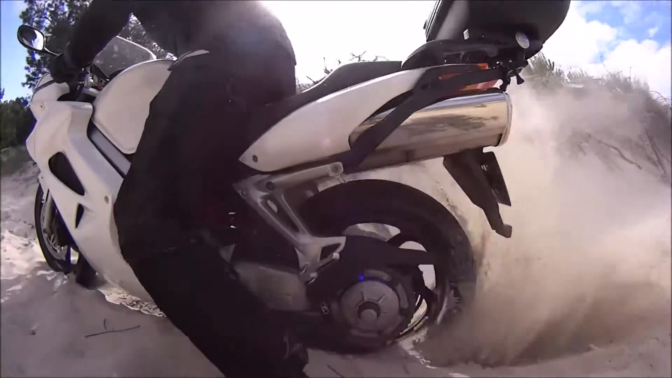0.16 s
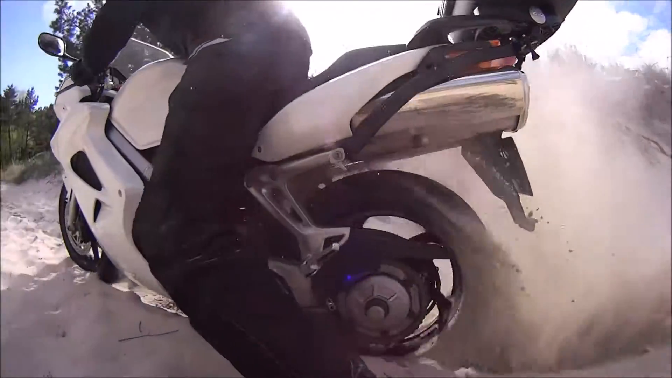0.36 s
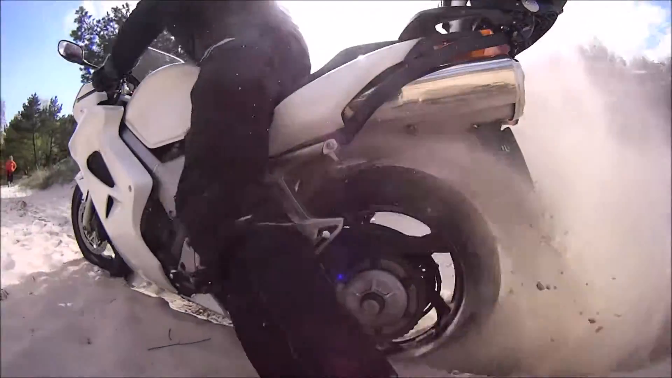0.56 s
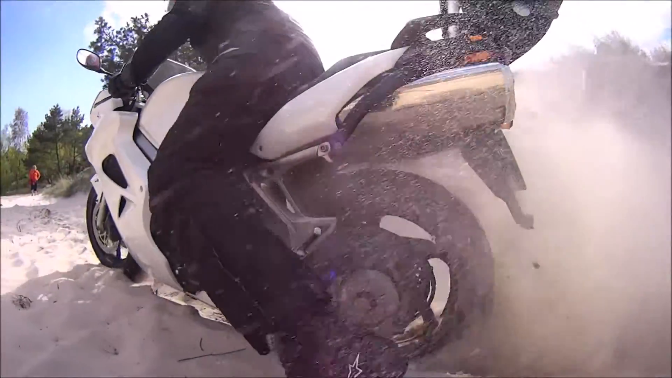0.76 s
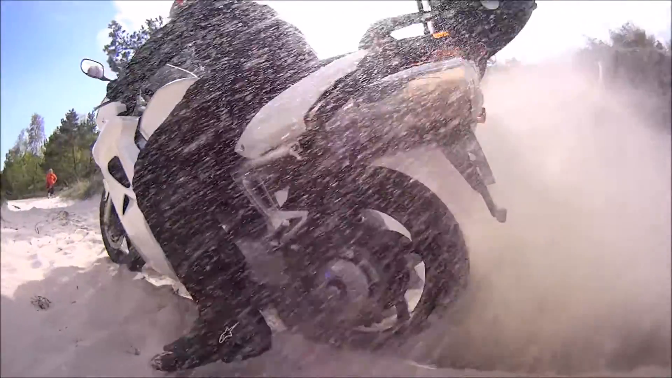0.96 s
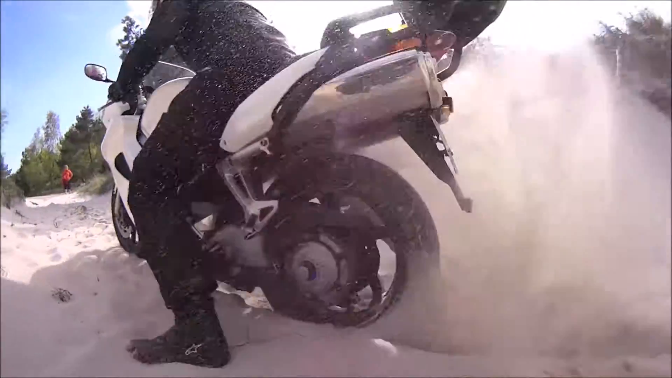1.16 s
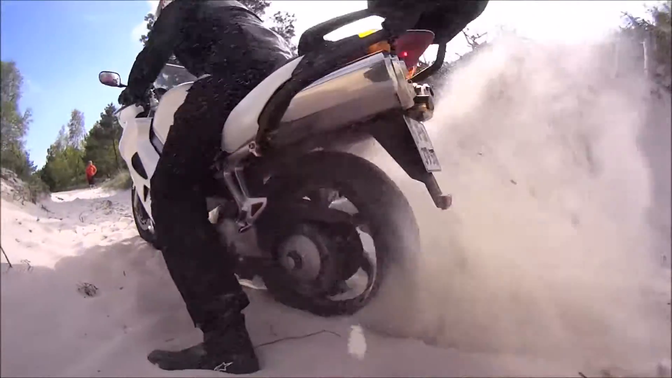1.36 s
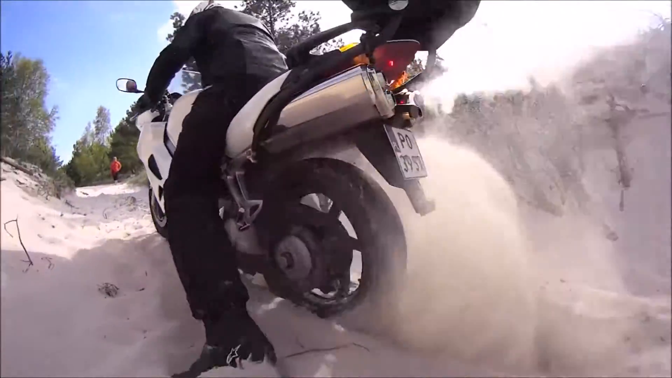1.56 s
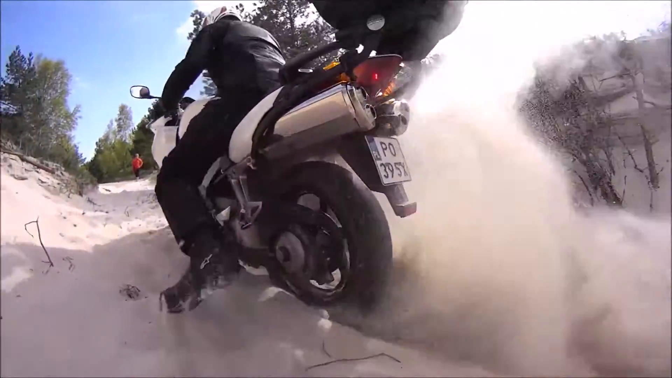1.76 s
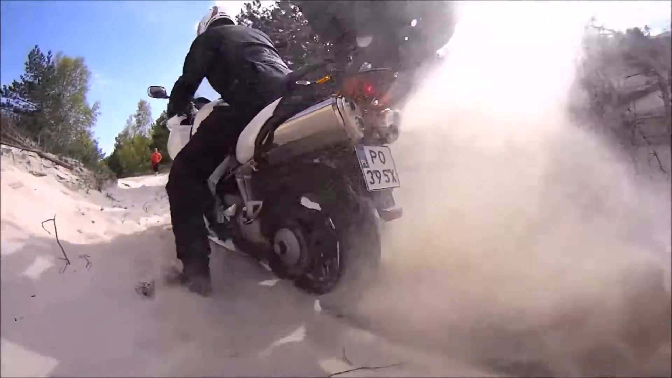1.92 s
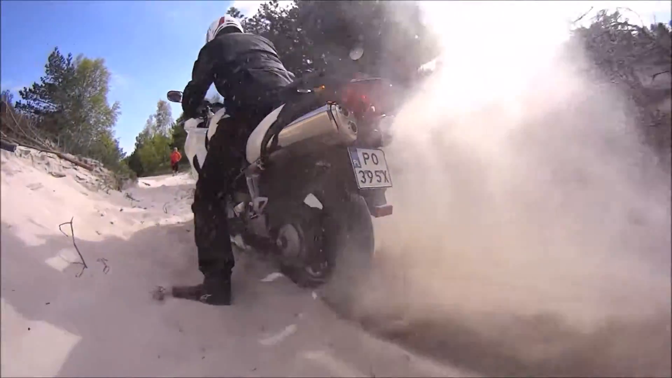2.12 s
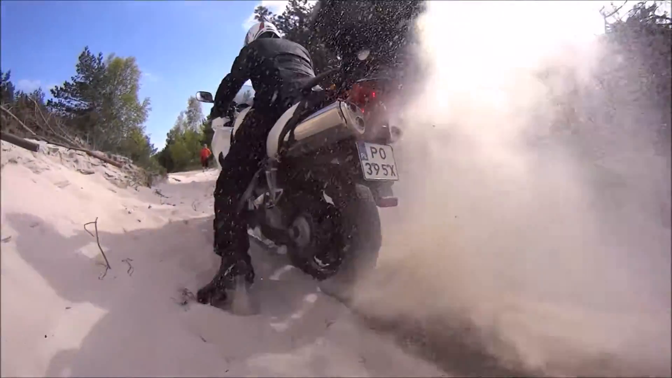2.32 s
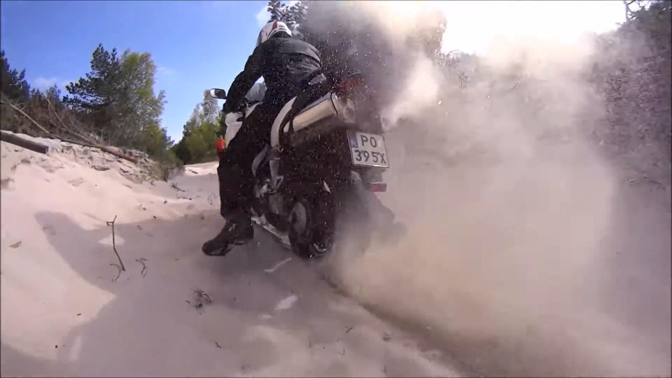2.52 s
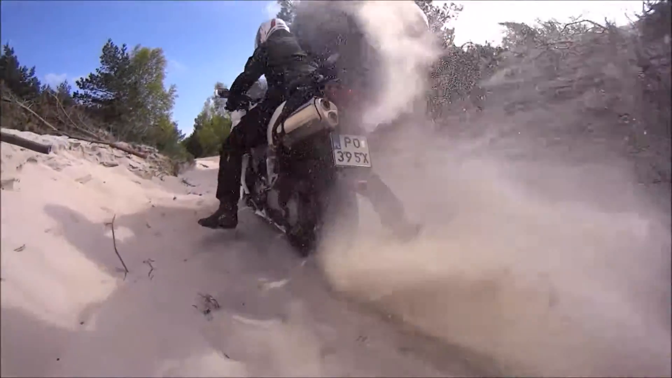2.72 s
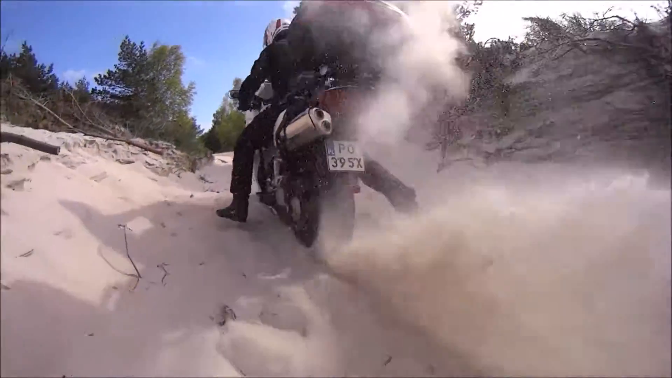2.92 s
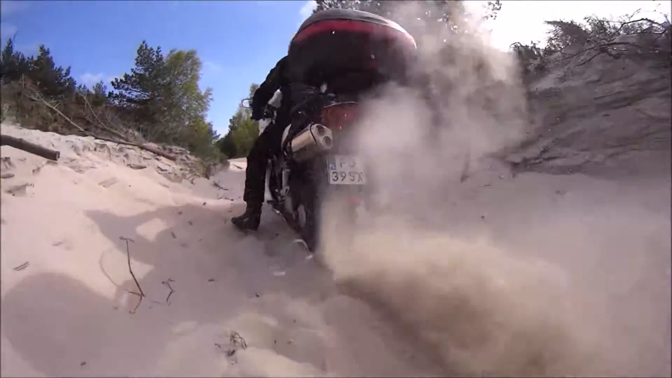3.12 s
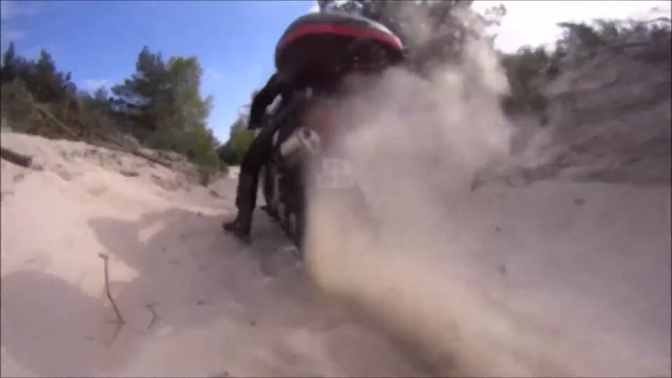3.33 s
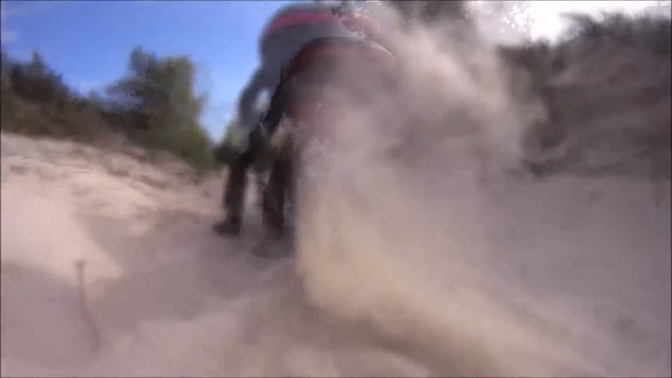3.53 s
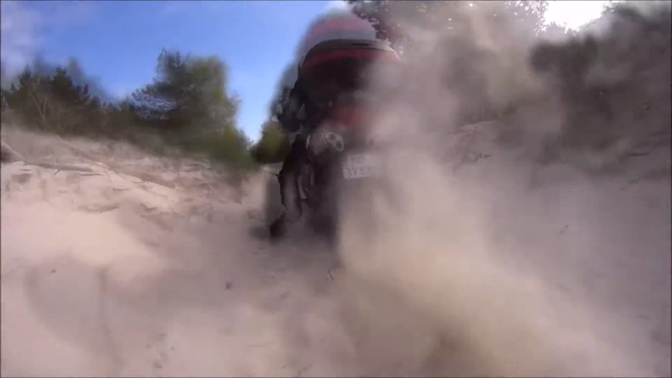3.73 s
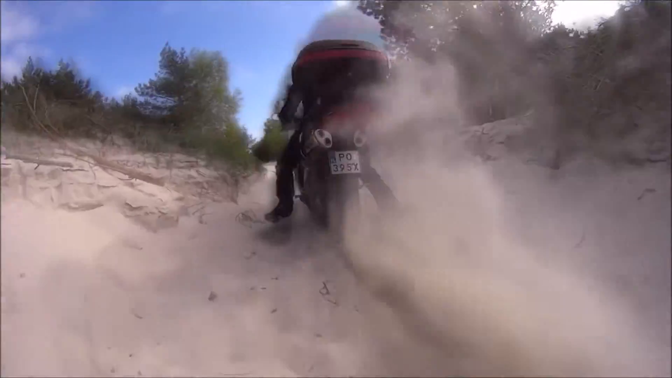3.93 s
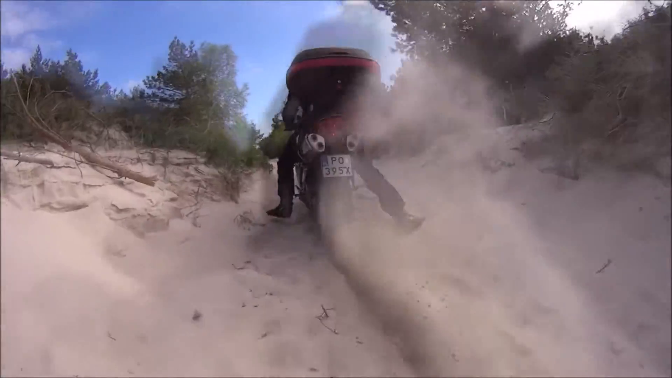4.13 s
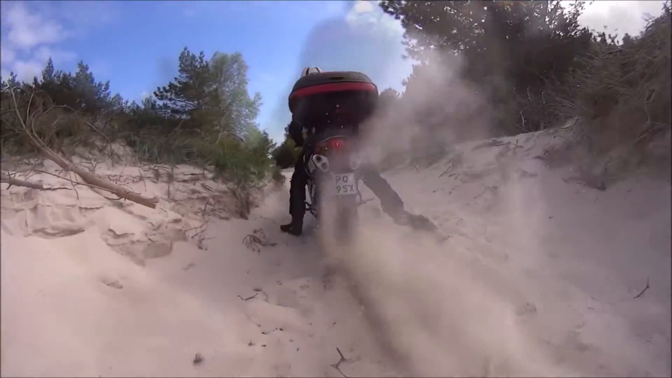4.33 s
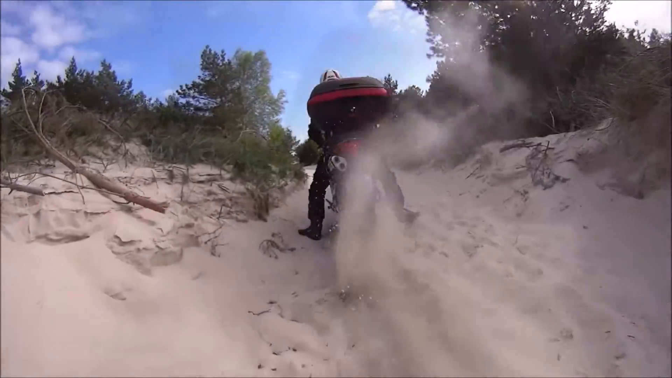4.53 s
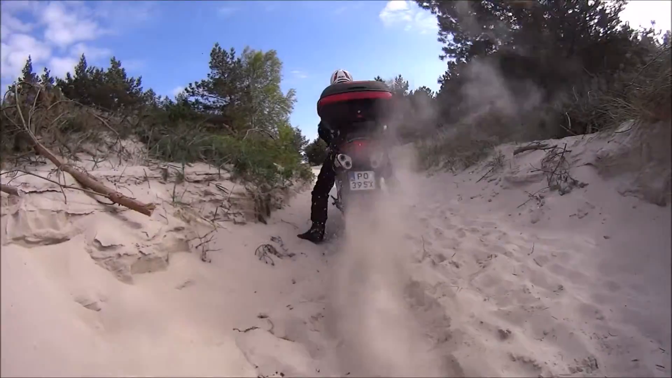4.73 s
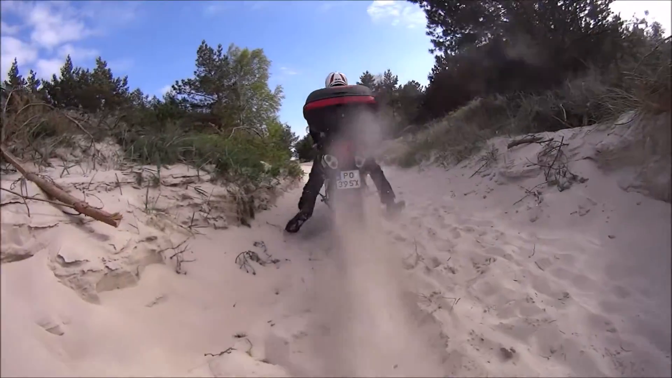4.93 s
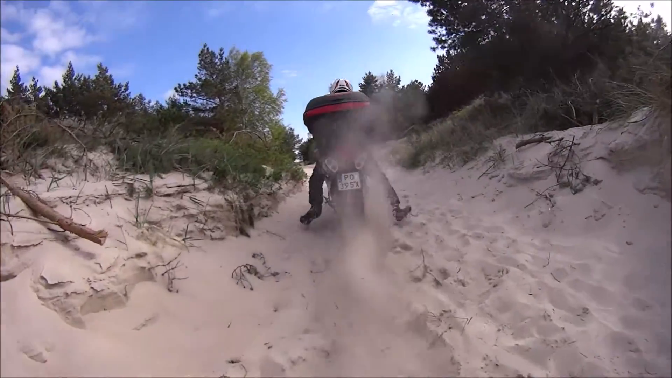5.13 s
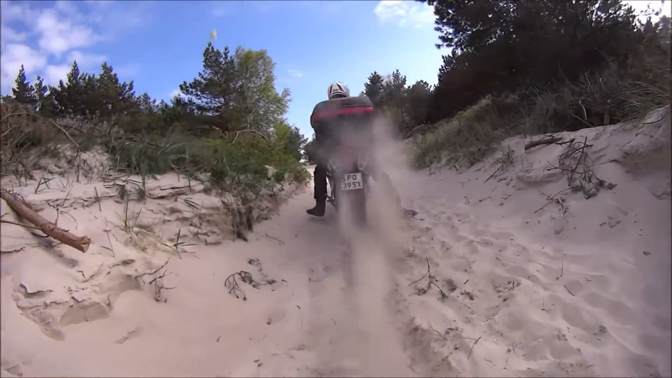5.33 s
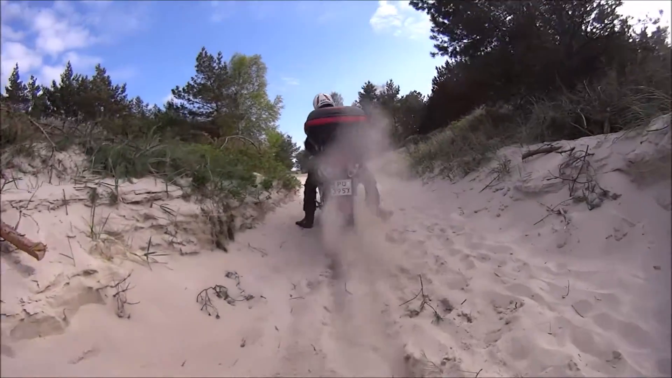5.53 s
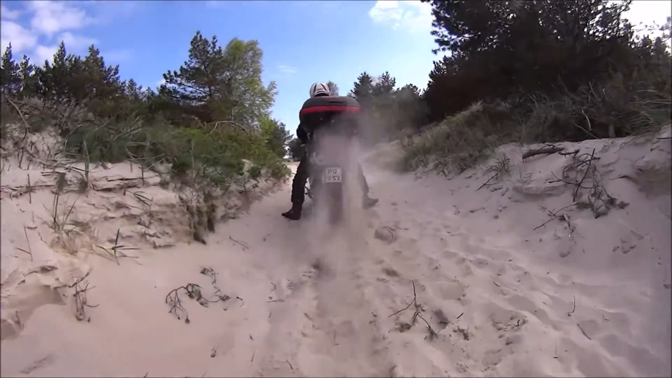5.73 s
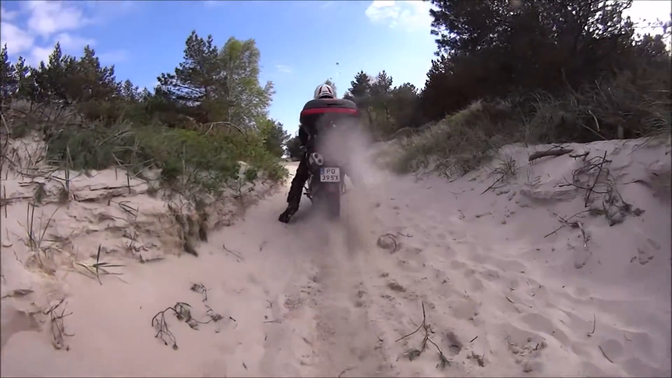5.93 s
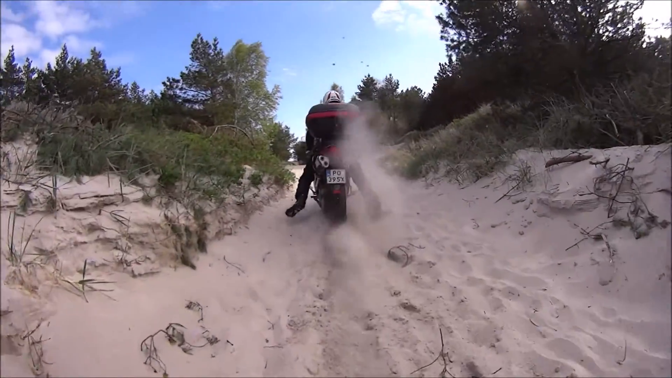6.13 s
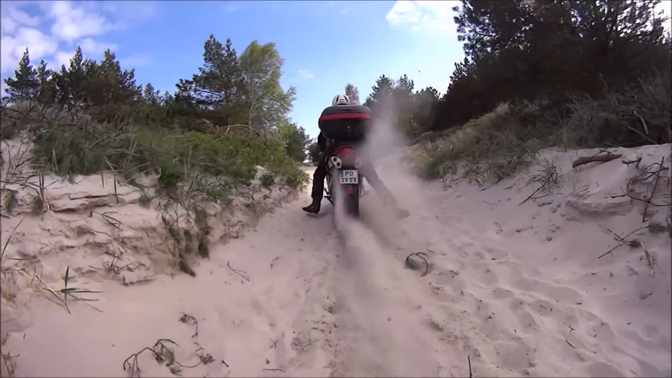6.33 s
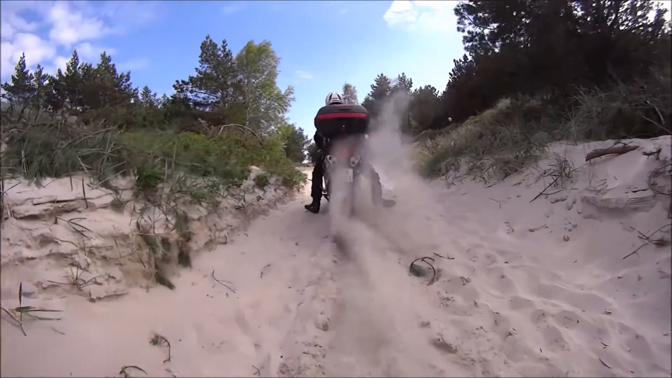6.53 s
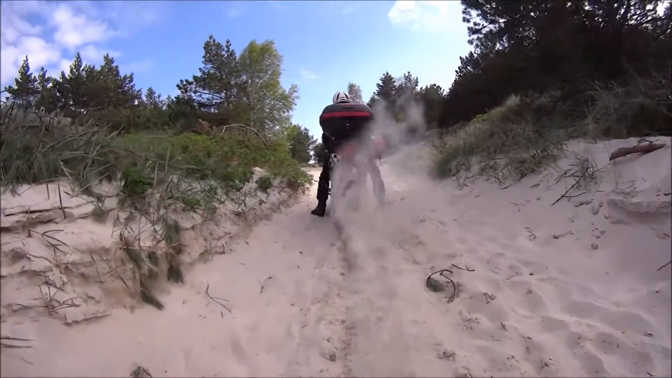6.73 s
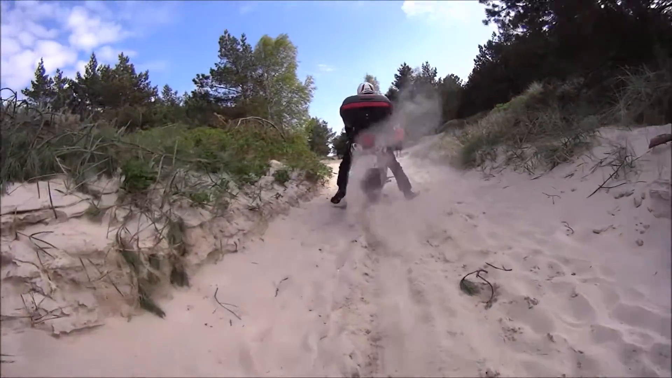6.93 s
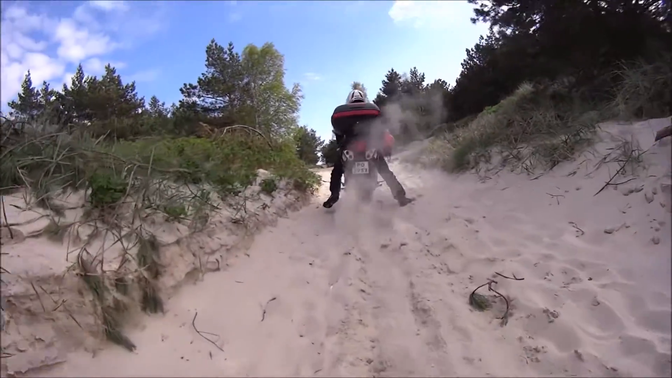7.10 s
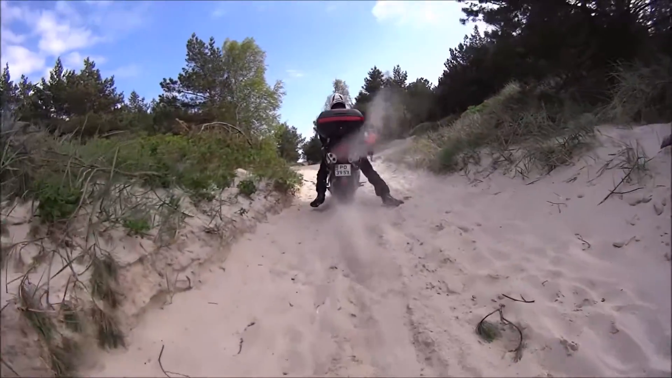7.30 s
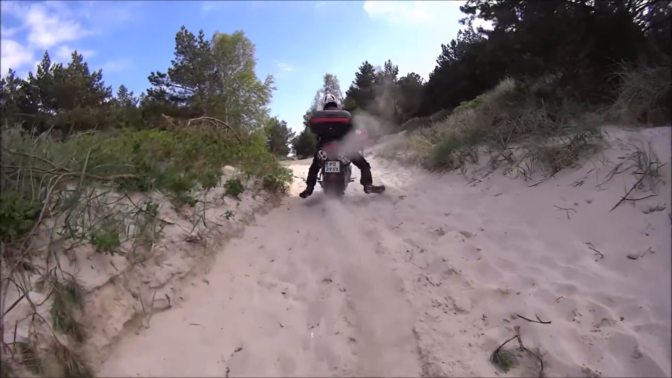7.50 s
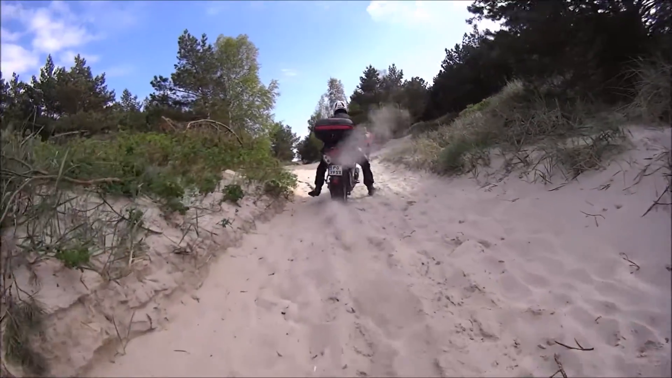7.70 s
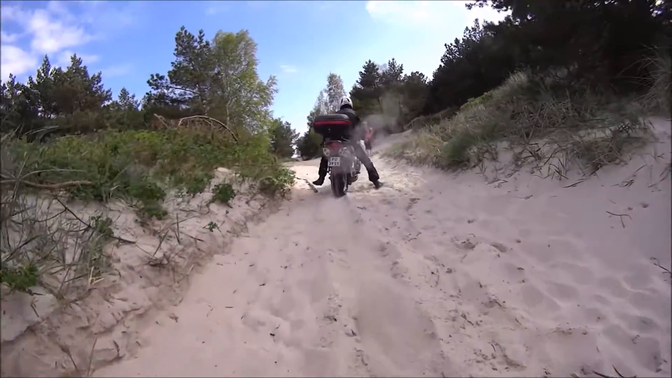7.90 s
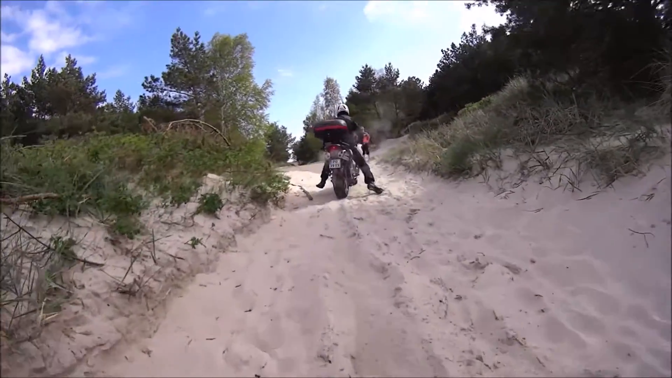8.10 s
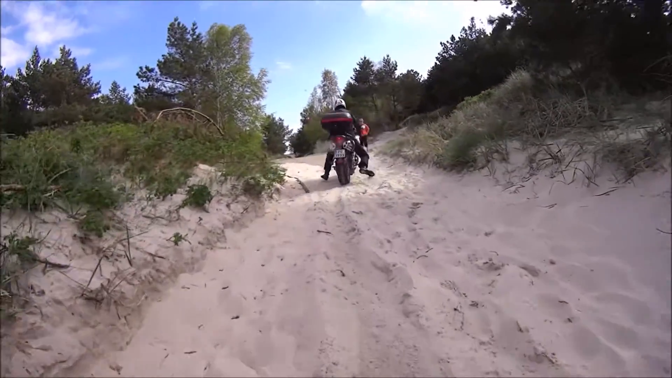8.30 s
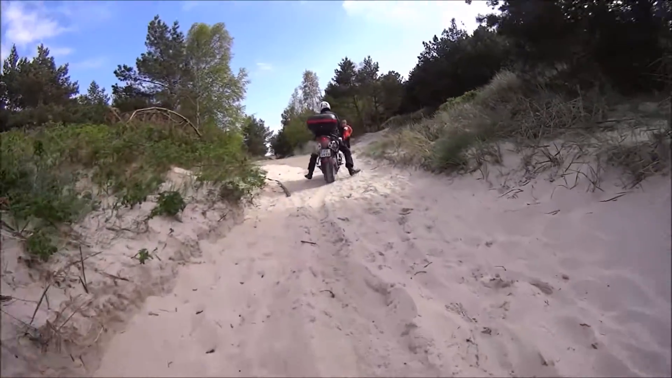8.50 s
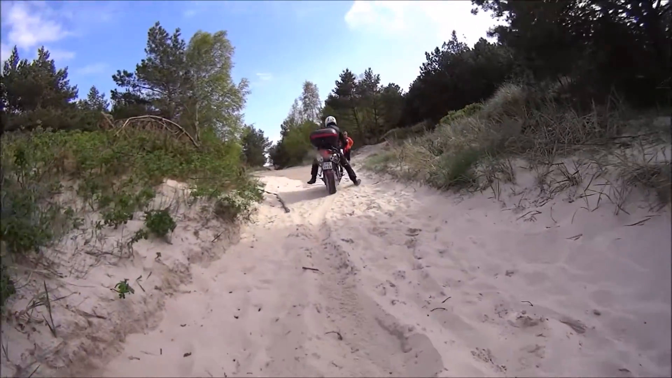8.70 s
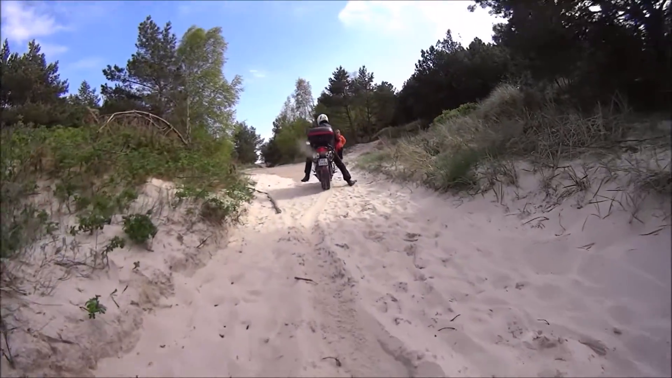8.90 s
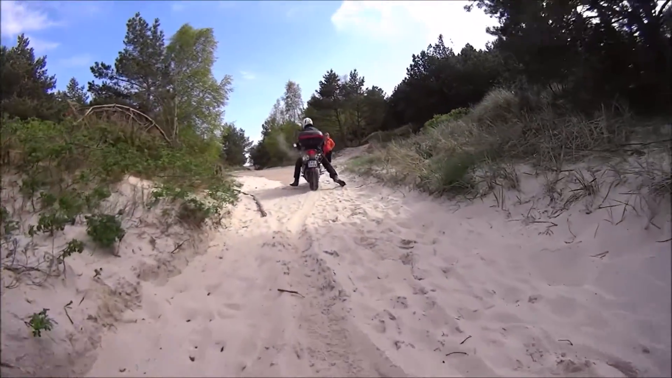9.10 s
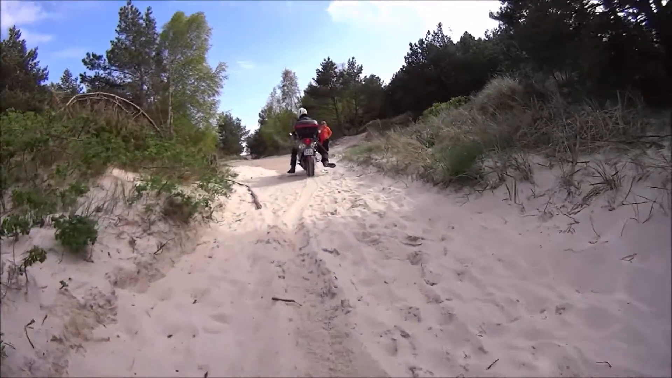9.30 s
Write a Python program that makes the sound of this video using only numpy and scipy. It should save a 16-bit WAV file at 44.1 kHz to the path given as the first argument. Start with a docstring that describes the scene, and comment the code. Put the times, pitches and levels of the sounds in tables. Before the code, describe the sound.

A motorcycle revs hard as its rear tyre sprays loose sand, harsh rattling clatter and whine wavering, then recedes and drops abruptly to a quiet idle.

```python
"""The drive chain of a V4 motorcycle clatters as its rear tyre spins and digs through loose sand, then it crawls away.
Clicks from the rollers and grains shape noise that follows the engine's angle; gear partials whine above it.
Uneven firing pulses excite the exhaust's boom and rasp; the engine bogs down once, recovers and drops to idle.
Two microphone ports in a plastic housing hear this with wind and rolling tyres as coloured noise.
The housing sings in resonated noise under the sand jets, and bumps on it are decaying tones."""
import sys
import numpy as np
from scipy import signal
from scipy.fft import rfft, irfft, next_fast_len
from scipy.io import wavfile
from scipy.ndimage import uniform_filter1d, map_coordinates

SR = 44100
rng = np.random.default_rng(int(sys.argv[2]) if len(sys.argv) > 2 else 0)


def bounce(signal):
    """Save signal as a 16-bit WAV file at the path given by the first command-line argument."""
    frames = np.transpose(np.atleast_2d(signal))
    limited = np.clip(frames, -1, 1)
    pcm = np.round(limited * 32767).astype(np.int16)
    wavfile.write(sys.argv[1], SR, pcm)


N = 412335
TIME = np.arange(N) / SR

# wind on the microphones, before the trims of its two parts: time_s, level_db
WIND_LEVEL = [(0, -50), (4.0, -41.5), (5.5, -49.5), (7.6, -50.5), (9.35, -57.5)]
# spectrum of the wind: frequency_hz, relative_density_db
WIND_SPECTRUM = [(8, -18), (22, -8), (40, -12.5), (80, -10), (130, -11.5), (220, -16.5), (400, -30.5),
                 (1000, -70)]
# spectrum of the tyres rolling through sand: frequency_hz, relative_density_db
ROLLING_SPECTRUM = [(100, 9), (220, 28.5), (330, -2), (480, 18), (750, 8), (1100, 8), (2000, -70)]
# bumps on the housing: start_s, thud_db, thud_hz, thud_t60_s, knock_db, knock_hz
HOUSING_BUMPS = [(2.481, -32, 130, .08, -23, 330), (3.309, -24, 146, 0.25, -20.5, 310),
                 (6.52, -27, 75, 0.11, -50, 300), (8.067, -19.5, 104, 0.041, -28, 315),
                 (8.243, -29, 100, 0.15, -48, 300), (8.361, -42, 120, .05, -39, 300),
                 (8.443, -25, 110, 0.063, -35, 377), (8.64, -29, 110, .06, -41, 280),
                 (9.231, -30, 108, 0.14, -31.5, 510), (9.27, -28, 119, 0.055, -38, 856)]
# the two microphone ports: frequency_hz, left_minus_right_db, left_lead_rad, coherence
PORT_RESPONSE = [(300, -0.7, 0.1, 0.78), (800, -1.2, 2.4, 0.31), (1300, 3.1, -0.7, 0.58),
                 (1550, 4.9, -1.4, 0.59), (2000, 3.0, -1.8, 0.89), (2400, 2.1, -2.9, 0.8),
                 (2900, -5.8, -4.5, 0.88), (3500, -2.8, -5.4, 0.77), (4400, 1.7, -5.9, 0.85),
                 (5400, 2.3, -6.4, 0.81), (6300, -2.3, -6.2, 0.52), (7600, -0.1, -6.0, 0.76),
                 (9100, 2.7, -6.6, 0.65), (10500, 0.6, -6.3, 0.75)]
# path of the ride: time_s, distance (0 near to 1 far), bearing (0 beside the silencer to 1 astern)
RIDE_PATH = [(0, 0.19, 0.19), (1.55, 0.18, 0.21), (1.9, 0.24, 0.84), (4.75, 0.23, 1), (5.35, 0.5, 0.75),
             (7.7, 0.54, 0.71), (9.35, 0.81, .7)]
# engine speed before smoothing: time_s, four_stroke_cycles_per_s
ENGINE_SPEED = [(0.0, 36.3), (0.87, 36.2), (1.15, 17.5), (1.3, 12.1), (1.57, 24.1), (1.9, 44.9),
                (2.21, 34.8), (2.78, 38.8), (3.0, 36.1), (3.27, 28.5), (3.42, 35.2), (3.97, 35.5),
                (4.22, 37.9), (4.61, 36.2), (4.88, 41.7), (5.1, 36.1), (5.3, 34.6), (5.72, 28.5),
                (6.06, 36.6), (6.33, 36.0), (6.67, 28.4), (6.98, 31.2), (7.16, 35.3), (7.77, 38.0),
                (7.97, 13.1), (8.13, 10.6), (9.35, 10.6)]
# moments of the four firings: phase_cycles
FIRING_PHASES = np.array([0, 180, 450, 630]) / 720
# silencer resonance met by the firings, before load, bearing and distance: engine_cycles_per_s, level_db
BOOM_RESONANCE = [(10.6, -42.5), (14, -31.5), (20, -31), (28, -36), (36, -33), (41, -30)]
# the boom's spectrum beside the silencer: frequency_hz, gain_db
BOOM_BESIDE = [(15, -38), (36, -2), (65, 14.5), (110, -0.5), (150, 2), (185, -1), (230, -8.5), (300, -40),
               (600, -25)]
# the boom's spectrum astern of the silencer: frequency_hz, gain_db
BOOM_ASTERN = [(15, -46), (36, -13), (70, 0), (110, -19.5), (150, 2.5), (180, -1), (230, -17.5),
               (300, -23.5), (600, -64)]
# brief changes in the level of the boom, mostly dips: middle_s, change_db
BOOM_DIPS = [(3.52, 1), (3.75, -13), (4.4, -6)]
# upper harmonics of the exhaust: frequency_hz, gain_db
RASP_SPECTRUM = [(200, -33), (310, -26), (400, 10.5), (470, -2), (570, 0), (750, 8), (1000, -7.5),
                 (1300, 7), (2000, 5.5), (3000, -51)]
# partials of the gear mesh: multiple, relative_level_db
MESH_PARTIALS = [(3, 0), (4, 0), (5, 0), (6, -1), (7, 0), (8, -5), (9, -2), (10, -5), (11, -5)]
# momentary changes of single whine partials, mostly flares: middle_s, length_s, multiple, change_db
WHINE_FLARES = [(.2, 0.77, 4, 5), (0.603, 0.91, 3, 10), (.92, 0.18, 4, 9), (2.064, 0.1, 6, 8),
                (2.17, 0.18, 3, 11), (2.313, 0.71, 9, 13.5), (2.86, 0.86, 3, 13), (2.88, .45, 4, 11.5),
                (4.92, 0.21, 3, 19), (5.217, 0.46, 4, 9), (5.5, .25, 5, 17), (6.23, 0.29, 7, 10),
                (6.4, 0.11, 4, 15), (6.68, 0.84, 5, 9), (7.224, 0.33, 7, 13.5), (7.3, 0.69, 6, 11),
                (7.5, 0.54, 3, 7.5), (7.72, .2, 4, -1)]
# casing resonances that the partials glide through: frequency_hz, gain_db
CASING_RESONANCES = [(1000, -30), (1300, -16), (1460, -4), (1650, -10), (1900, 1), (2080, -1), (2400, -14),
                     (2880, 0), (3100, -7), (3370, 0), (3700, -11), (4400, -3), (5000, -12)]
# jets of sand on the housing, against the clatter: start_s, end_s, level_db
SAND_JETS = [(0, 0.503, -10.5), (3.32, 4.79, -6.5)]
# short spurts of sand, added to the clatter's gain: start_s, length_s, level_db
SAND_SPURTS = [(8.131, 0.054, -46.5), (8.741, 0.05, -40)]
# chain and sand together, before trim and load: time_s, level_db
CLATTER_LEVEL = [(0.0, -17.5), (0.07, -19), (0.96, -17), (1.2, -24.5), (1.25, -29.5), (1.35, -22.5),
                 (1.69, -18), (3.07, -18.5), (3.25, -21.5), (3.31, -16.5), (4.76, -18), (4.84, -22),
                 (5.7, -28), (5.96, -24), (6.77, -29.5), (7.79, -25), (7.99, -43.5), (8.7, -46.5),
                 (8.77, -44), (8.83, -47), (9.35, -48)]
# clatter through the housing from near: frequency_hz, relative_density_db
CLATTER_NEAR = [(100, -50), (450, -22.5), (850, -32.5), (1300, -12), (1650, -8), (1900, -6.5), (2200, -5.5),
                (2550, -11), (2870, 4), (3150, -8.5), (3700, -9.5), (5300, -9.5), (6250, -16), (7400, -12),
                (9500, -20), (10900, -28)]
# clatter through the housing from far: frequency_hz, relative_density_db
CLATTER_FAR = [(100, -50), (450, -24.5), (850, -16.5), (1300, -14.5), (1650, -6.5), (1900, -2),
               (2200, -0.5), (2870, -6), (3150, 0), (3700, -10.5), (5300, -7), (6250, -15.5), (7400, -7.5),
               (8600, -21), (9400, -12.5), (10900, -29)]

WIND_SHARED_DB, WIND_APART_DB = 4.5, 3  # trims: the part both ports hear alike, and the part that differs
ROLLING_DB, ROLLING_FAR_DB = -43.5, -8.5  # near level, change far away
FLYWHEEL_S = .11  # span over which the flywheel rounds off every change of speed
THROTTLE_LEAD_S = 0.04  # the throttle moves this long before the revs follow
FULL_LOAD_OCT_PER_S = 4.7  # a rise in revs that takes most of the throttle
BOOM_LOAD_DB, BOOM_ASTERN_DB, BOOM_FAR_DB = 6, 1, -11.5  # change at full load, astern and far away
DIP_S = .035  # time from the middle of a dip to 1/e of its depth in dB
RASP_DB, RASP_LOAD_DB, RASP_ASTERN_DB, RASP_FAR_DB = -37, 7, 9.5, -44  # near level, and the same three changes
CHAIN_ORDER, MESH_ORDER = 5.78, 13.41  # links and gear teeth met per engine cycle
WHINE_DB, WHINE_LOAD_DB, WHINE_IDLE_DB = -11, -4, -10  # against the clatter; strongest as the revs fall
JET_EDGE_S, STRAY_SAND_DB = 0.055, -20.5  # how fast a jet arrives and leaves; the singing between jets
TILT_FAR_DB, TILT_DB_PER_OCT, CRUISE_HZ = -2.5, 1, 36  # duller from afar, brighter above cruising cycles per s
EDGE_HZ = 11150  # upper band limit


def amp(db):
    """Converts decibels to a ratio of amplitudes."""
    return 10 ** (np.asarray(db) / 20)


def evened(x):
    """Normalises mean power: scales to rms 1."""
    return x / np.sqrt(np.mean(x ** 2) + 1e-20)


def levelled(x, size=5000):
    """Normalises short-term power: divides by a running rms."""
    power = uniform_filter1d(uniform_filter1d(x ** 2, size), size)
    return x / np.sqrt(abs(power) + 1e-12)


def curves(rows):
    """Linear interpolation of every column of a time table at each sample."""
    s, *columns = np.transpose(rows)
    return [np.interp(TIME, s, c) for c in columns]


def read(rows, hz):
    """Interpolation of every column of a frequency table, on a logarithmic frequency axis."""
    f, *columns = np.transpose(rows)
    return [np.interp(np.log(hz + 1), np.log(f + 1), c) for c in columns]


def spectrum(x):
    """Fourier analysis of a padded signal: frequencies and complex amplitudes."""
    size = next_fast_len(N + 4096, True)
    return np.fft.rfftfreq(size, 1 / SR), rfft(x, size)


def coloured(x, points):
    """Linear filtering: weights the spectrum by a table of frequency and gain."""
    hz, z = spectrum(x)
    return irfft(z * amp(read(points, hz)[0]))[:N]


def wander(hz):
    """Slow random fluctuation: rms 1, with a new random target hz times a second."""
    return evened(np.interp(TIME * hz, np.arange(20000), rng.standard_normal(20000)))


def resonate(x, hz, width):
    """Forced resonance: a two-pole filter at hz with a bandwidth of width in Hz."""
    r = np.exp(-np.pi * width / SR)
    return signal.lfilter([1 - r, 0, r - 1], [1, -2 * r * np.cos(2 * np.pi * hz / SR), r * r], x)


def beats(turns):
    """Periodic impulses: a unit click each time turns passes a whole number."""
    return np.diff(np.floor(turns), prepend=np.floor(turns[0]))


def ring_out(x, seconds):
    """Exponential decay: each click falls to 1/e in the given seconds."""
    return signal.lfilter([1], [1, -np.exp(-1 / (seconds * SR))], x)


def add(mix, s, sound):
    """Superposition: mixes a sound in at time s."""
    part = mix[round(s * SR):][:len(sound)]
    part += sound[:len(part)]


def revs():
    """Rotational inertia: engine cycles per second, smoothed by the flywheel."""
    return uniform_filter1d(curves(ENGINE_SPEED)[0], int(FLYWHEEL_S * SR), mode="nearest")


def pulling():
    """Drive engagement by speed: 0 at idle with the clutch in, 1 while the engine drives the wheel."""
    return np.clip((revs() - 11) / 6, 0, 1)


def engine_load(speed):
    """Torque follows angular acceleration: -1 with the throttle shut, 1 with it wide open."""
    climb = np.gradient(np.log2(speed), TIME)
    return np.tanh(np.interp(TIME + THROTTLE_LEAD_S, TIME, climb) / FULL_LOAD_OCT_PER_S)


def ports(direct, scattered):
    """Spatial coherence: direct sound differs in gain and phase at two ports, scattered sound also in sign."""
    hz, a = spectrum(direct)
    b = spectrum(scattered)[1]
    balance_db, lead, same = read(PORT_RESPONSE, hz)
    same = np.clip(same, 0, 1)
    a = a * np.sqrt((1 + same) / 2)
    b = b * np.sqrt((1 - same) / 2)
    turn = amp(balance_db / 2) * np.exp(.5j * lead)  # half the difference goes to each port
    mean_gain = np.sqrt((amp(balance_db) + amp(-balance_db)) / 2)
    return irfft(np.array([(a + b) * turn, (a - b) / turn]) / mean_gain)[:, :N]


def air(level_db, colour, gust_db):
    """Broadband noise: one colour, modulated by random gusts."""
    return amp(level_db + gust_db * wander(14)) * evened(coloured(rng.standard_normal(N), colour))


def wind(trim_db, gust_db):
    """Turbulent pressure on the microphones: gusty noise that is strongest in the bass."""
    return air(curves(WIND_LEVEL)[0] + trim_db, WIND_SPECTRUM, gust_db)


def rolling_tyres(far):
    """Rolling friction in sand: a rush of noise that weakens with distance."""
    return air(ROLLING_DB + ROLLING_FAR_DB * far, ROLLING_SPECTRUM, gust_db=-0.5)


def bumps(knock_t60=0.026, rise_s=0.0027, tick_db=-2, tick_s=0.001):
    """Impact response: each bump gives a decaying low thud, a short hollow knock and a dull tick."""
    out = np.zeros(N)
    t = np.arange(SR // 4) / SR
    for s, thud_db, thud_hz, t60, knock_db, knock_hz in HOUSING_BUMPS:
        thud = amp(thud_db - 60 * t / t60) * np.sin(2 * np.pi * thud_hz * t)
        thud = thud * (1 - np.exp(-t / rise_s))
        knock = amp(-60 * t / knock_t60) * np.sin(2 * np.pi * knock_hz * t)
        noise = evened(resonate(rng.standard_normal(len(t)), 2 * knock_hz, knock_hz))
        tick = amp(tick_db) * noise * np.exp(-t / tick_s)
        add(out, s, thud + amp(knock_db) * (knock + tick))
    return out


def firings(turns, imbalance, uneven, surge=0.22):
    """Pulse excitation: four unevenly spaced firings a cycle, one cylinder bank heard more than the other."""
    banks = (1, 1, -1, -1)
    pulses = sum(beats(turns - at) * (1 + bank * imbalance) for at, bank in zip(FIRING_PHASES, banks))
    return pulses * (1 + uneven * rng.standard_normal(N) + surge * wander(14))


def exhaust_boom(turns, speed, load, far, astern):
    """Cavity resonance and directivity: pulses boom with the bearing, but the slow idle spreads all round."""
    pulses = firings(turns, astern, uneven=.4 - .32 * pulling())
    boom = (1 - astern) * coloured(pulses, BOOM_BESIDE) + astern * coloured(pulses, BOOM_ASTERN)
    boom_db = read(BOOM_RESONANCE, speed)[0]
    boom_db = boom_db + BOOM_LOAD_DB * load + BOOM_ASTERN_DB * astern + BOOM_FAR_DB * far
    dips_db = sum(db * np.exp(-((TIME - s) / DIP_S) ** 2) for s, db in BOOM_DIPS)
    return amp(boom_db + dips_db) * levelled(boom)


def exhaust_rasp(turns, load, far, astern):
    """Harmonics of a pulse train: the upper part of the exhaust, from both banks nearly alike."""
    rasp = coloured(firings(turns, astern / 4, uneven=.1), RASP_SPECTRUM)
    rasp_db = RASP_DB + RASP_LOAD_DB * load + RASP_ASTERN_DB * astern + RASP_FAR_DB * far
    return pulling() * amp(rasp_db) * levelled(rasp)


def flare(multiple):
    """Amplitude modulation of one whine partial in dB: each change swells and fades like a bell curve."""
    return sum(db * np.exp(-(2 * (TIME - s) / length) ** 2)
               for s, length, k, db in WHINE_FLARES if round(k) == multiple)


def gear_whine(turns, waver_db=3.0):
    """Tooth-mesh harmonics: smeared by backlash, throbbing with the chain and flaring one at a time."""
    mesh = turns * MESH_ORDER + .035 * wander(22) + .013 * wander(300)
    partials = 0
    for k, db in MESH_PARTIALS:
        level = amp(db + flare(k) + waver_db * wander(12))
        partials = partials + level * np.cos(2 * np.pi * (k * mesh + rng.random()))
    throb = 1 + .35 * np.cos(np.pi * turns * CHAIN_ORDER)  # one throb per pair of links
    return evened(partials * throb)


def sand_jet():
    """Excitation by impacts: how hard sand strikes the housing, a little always and much more in each jet."""
    jets = (amp(db) * np.clip(np.minimum(TIME - start, end - TIME) / JET_EDGE_S + .5, 0, 1)
            for start, end, db in SAND_JETS)
    return np.maximum(amp(STRAY_SAND_DB), sum(jets))


def housing_song(sing_hz=1905, sing_width=45):
    """Forced vibration: the sand jet's noise drives a narrow resonance of the housing (Hz)."""
    narrow = resonate(rng.standard_normal(N), sing_hz, sing_width)
    return sand_jet() * evened(resonate(narrow, sing_hz, 320))


def housing(x, far, tilt_db):
    """Transmission through a case: it colours the clatter, by distance and a tilt about 3600 Hz."""
    x = (1 - far) * evened(coloured(x, CLATTER_NEAR)) + far * evened(coloured(x, CLATTER_FAR))
    low = signal.sosfiltfilt(signal.butter(2, 3600, fs=SR, output="sos"), x)
    return evened(low * amp(-tilt_db) + (x - low) * amp(tilt_db))


def recurring(turns, patchy_db, size=2048):
    """Order-locked vibration: worn teeth and links ring at uneven orders, so peaks glide with the revs."""
    count = size * 320  # noise laid out over 320 engine cycles
    peaks = np.interp(np.arange(count // 2 + 1) / 260, np.arange(size), rng.standard_normal(size))
    gain = amp(patchy_db * np.minimum(evened(peaks), 2))
    by_angle = irfft(rfft(rng.standard_normal(count)) * gain)
    return evened(map_coordinates(by_angle, [turns * size], order=3, mode="wrap"))


def chain_and_sand(turns, link_share=0.25, link_s=0.0013, alternate=0.2, flutter_db=1.02, grains_per_s=600):
    """Repeated impact: rollers slap the sprocket, links alternate; sand hisses and single grains tick."""
    links = beats(turns * CHAIN_ORDER) * (1 + alternate * np.cos(np.pi * turns * CHAIN_ORDER))
    slaps = evened(ring_out(links * rng.uniform(.5, 1.5, N), link_s))
    share = np.clip(link_share, 0, 1) * pulling()
    flutter = amp(flutter_db * (wander(25) + wander(130)) / np.sqrt(2))
    envelope = np.sqrt(share * slaps ** 2 + 1 - share) * flutter
    sizes = amp(3.5 * np.minimum(rng.exponential(1, (2, N)), 4)) * rng.choice([-1, 1], (2, N))
    grains = .33 * evened(sizes * (rng.random((2, N)) < grains_per_s / SR))
    # as the chain tightens and slackens, one set of ringing orders gives way to another
    slack = 1.5 * wander(4)
    ringing = np.cos(slack) * recurring(turns, patchy_db=5) + np.sin(slack) * recurring(turns, patchy_db=5)
    ringing = np.sqrt(pulling()) * ringing + np.sqrt(1 - pulling()) * rng.standard_normal(N)
    # first row direct, second row scattered
    return evened(envelope * np.array([ringing, rng.standard_normal(N)]) + grains)


def drivetrain(turns, speed, load, far, level_db=2, load_db=0.95):
    """Superposed drive noise: chain, sand and gears, with the singing housing and idle spurts of sand."""
    gain = amp(curves(CLATTER_LEVEL)[0] + level_db + load_db * load)
    for s, length, db in SAND_SPURTS:
        add(gain, s, amp(db) * signal.windows.tukey(int(length * SR), .3))
    tilt_db = TILT_FAR_DB * far + TILT_DB_PER_OCT * np.log2(speed / CRUISE_HZ)
    direct, scattered = (housing(x, far, tilt_db) for x in chain_and_sand(turns))
    whine_db = WHINE_DB + WHINE_LOAD_DB * load + WHINE_IDLE_DB * (1 - pulling())
    whine = amp(whine_db) * evened(coloured(gear_whine(turns), CASING_RESONANCES))
    return gain * (direct + whine + housing_song()), gain * scattered


def scene():
    """Common rotation: one crankshaft drives exhaust, gears and chain; the bass is nearly alike at both ports."""
    speed = revs()
    load = engine_load(speed)
    turns = np.cumsum(speed * (1 + .002 * wander(30))) / SR  # engine cycles so far
    far, astern = np.clip(curves(RIDE_PATH), 0, 1)
    astern = astern * pulling()
    direct, scattered = drivetrain(turns, speed, load, far)
    boom = exhaust_boom(turns, speed, load, far, astern)
    rasp = exhaust_rasp(turns, load, far, astern)
    scattered = scattered + rolling_tyres(far) + wind(WIND_APART_DB, gust_db=2)
    bass = boom + wind(WIND_SHARED_DB, gust_db=1.5) + bumps()
    return ports(direct + rasp, scattered) + bass


def record(dry):
    """Amplitude and band limits: the tallest peaks are clipped, then a low-pass filter removes the top."""
    clipped = np.clip(dry, -.75, .75)
    lowpass = signal.firwin(801, EDGE_HZ, window=("kaiser", 9), fs=SR)
    return signal.oaconvolve(clipped, lowpass[None], "same", axes=1)


dry = scene()
out = record(dry)
bounce(out)
```